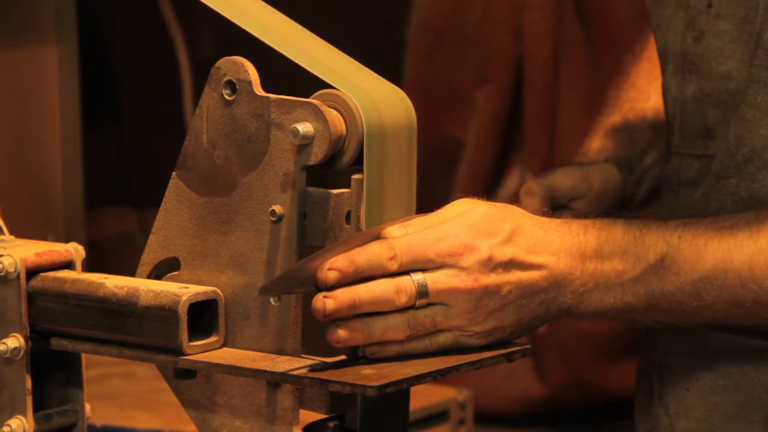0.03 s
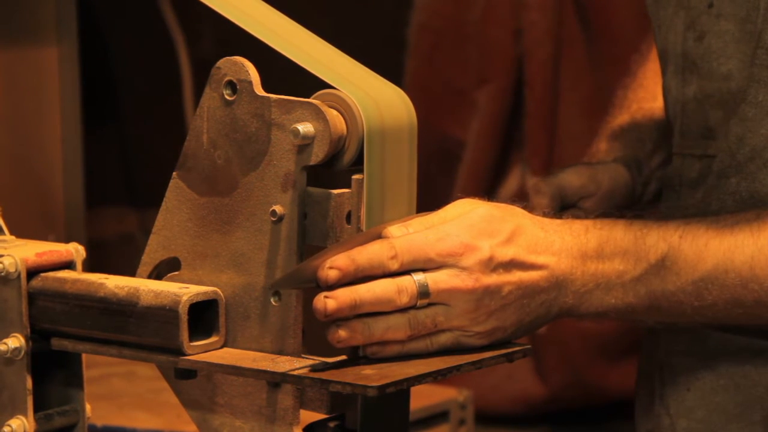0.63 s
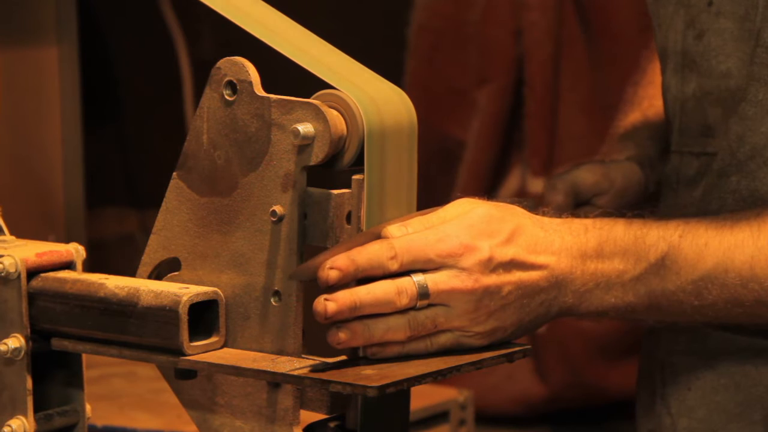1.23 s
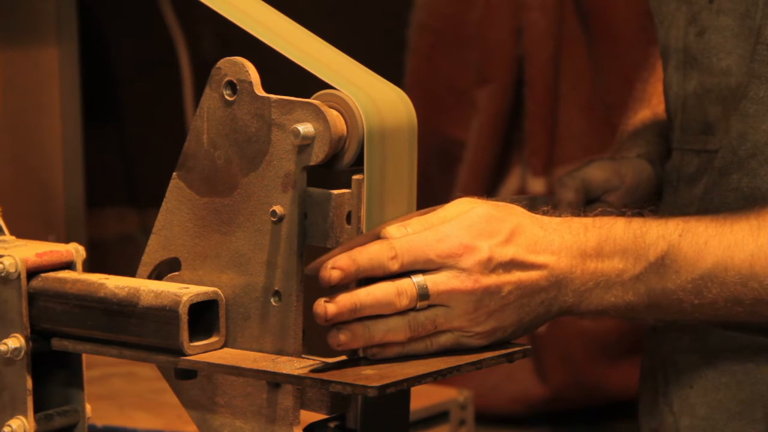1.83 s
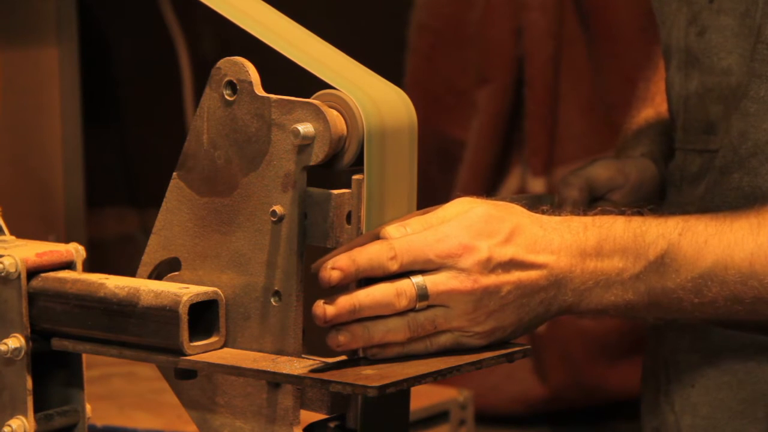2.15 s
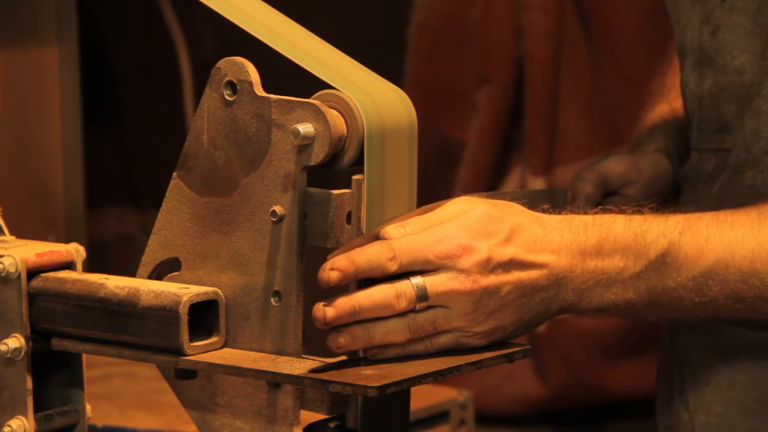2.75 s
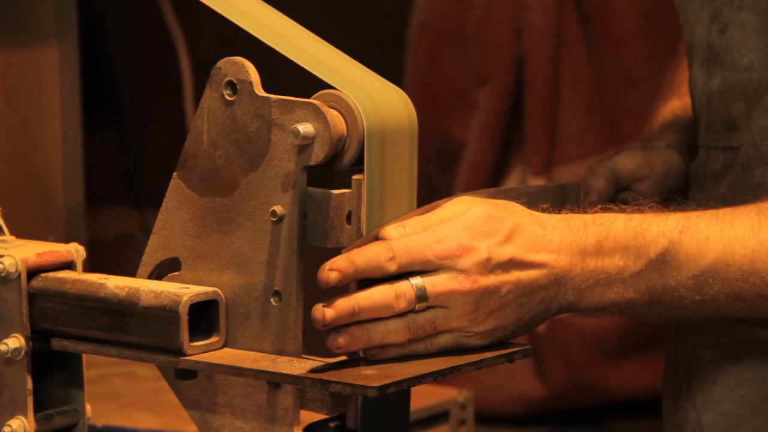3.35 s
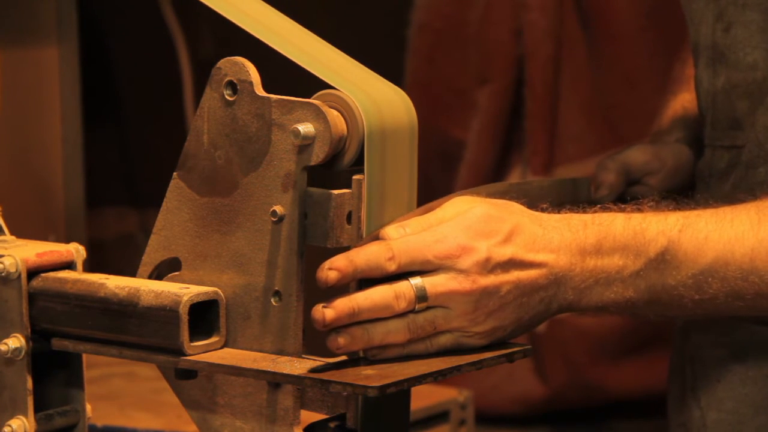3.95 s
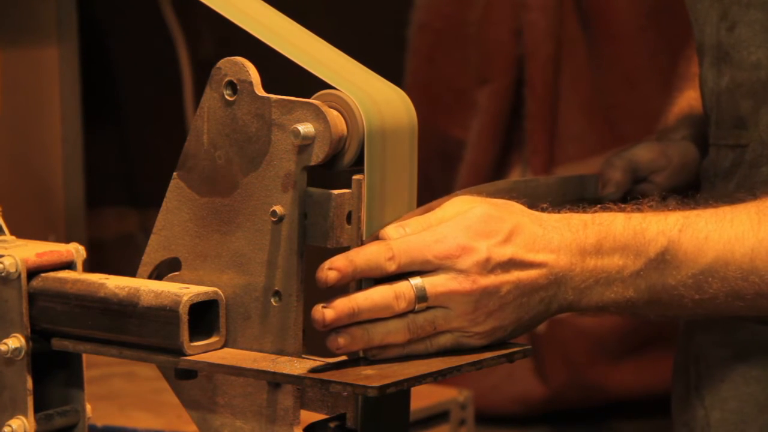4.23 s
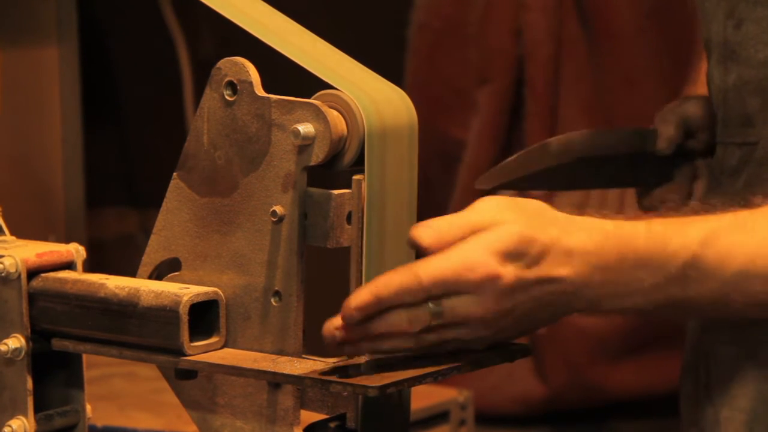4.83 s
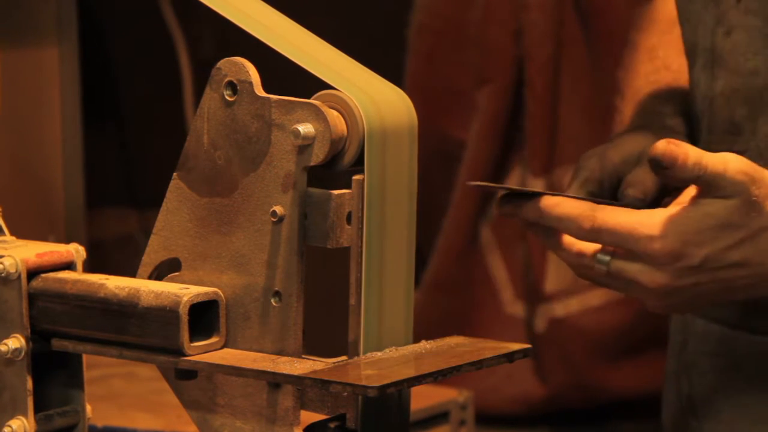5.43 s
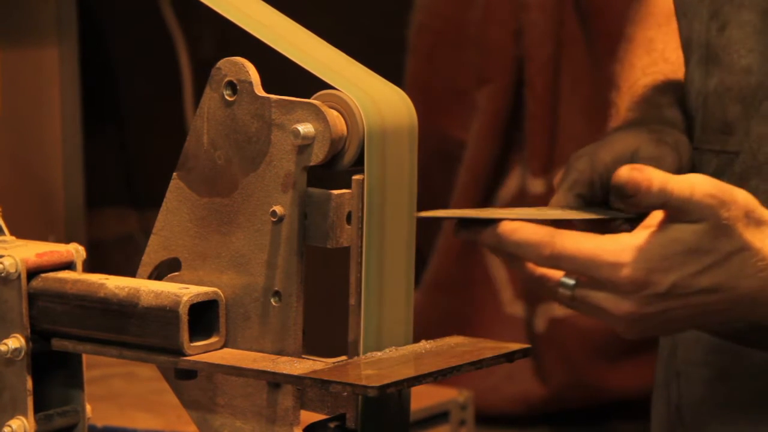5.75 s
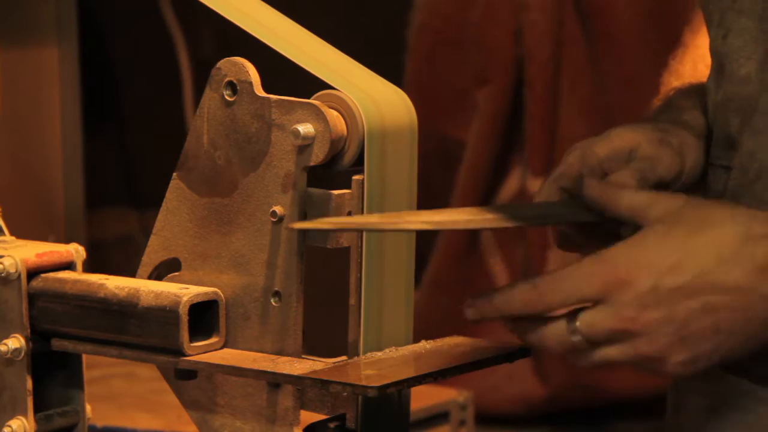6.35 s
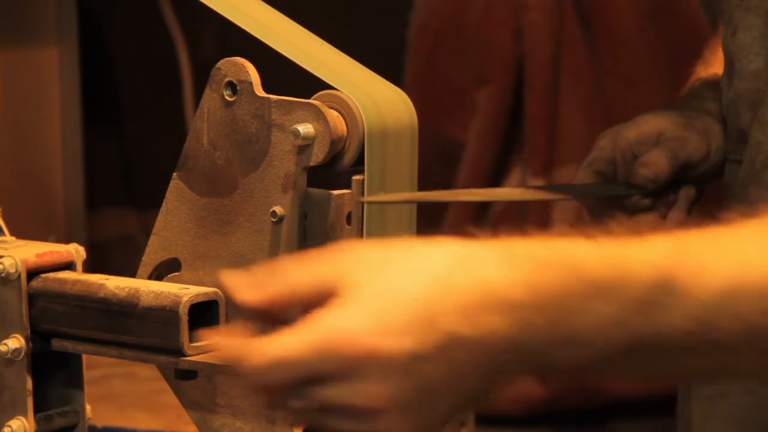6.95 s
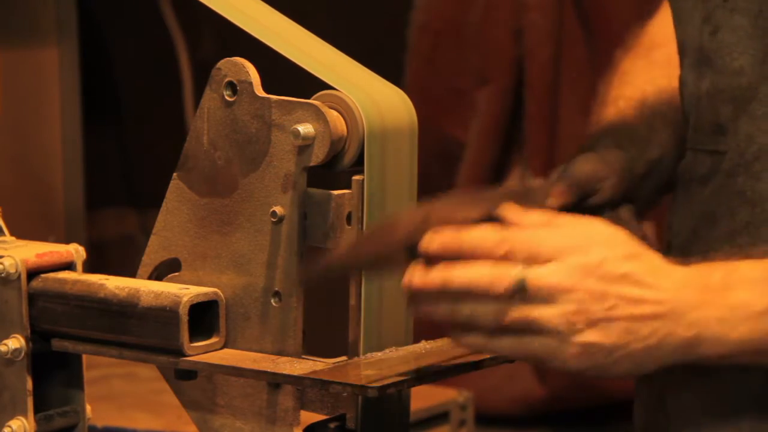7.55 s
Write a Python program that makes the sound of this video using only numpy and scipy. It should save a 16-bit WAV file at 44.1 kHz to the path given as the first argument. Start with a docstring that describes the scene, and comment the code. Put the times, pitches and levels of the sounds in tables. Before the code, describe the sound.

Harsh, gritty grinding of a knife on an abrasive belt gives way to the machine running free with a thin, high whine.

```python
"""A steel knife blank is drawn along a running belt grinder in a small workshop, heel first.
Grit hisses on the steel and rings the blade, over the belt's drone and taps, a bearing's throbbing
whine and a faintly singing motor drive. At 2.5 s the contact slides on to the curve and rasps more.
Near 4.5 s the blade lifts off and the belt runs free, its taps now louder, repeating the same pattern
each lap. Throughout, one close microphone with gain control holds the loudness even."""
import sys
import numpy as np
from scipy import signal
from scipy.fft import rfft, irfft
from scipy.io import wavfile
from scipy.ndimage import uniform_filter1d, minimum_filter1d, map_coordinates

SR = 44100
rng = np.random.default_rng(int(sys.argv[2]) if len(sys.argv) > 2 else 0)


def materialize(psi):
    """Save the field psi as 16-bit PCM at rate SR to the path in sys.argv[1].

    A 1-D psi becomes a single channel; in a 2-D psi each row is a channel.
    """
    bounded = np.clip(np.atleast_2d(psi).T, -1, 1)
    quanta = np.round(bounded * 32767).astype(np.int16)
    wavfile.write(sys.argv[1], SR, quanta)


N = 335160
TIME = np.arange(N) / SR


# The hand pressing the blade on the belt, unsteady at first, then even: (time [s], pressure [dB])
HAND_PRESSURE = [(0.0, -0.3), (0.11, -1), (0.14, -2), (0.18, -3), (0.2, 0.8), (0.32, 1.4), (0.375, -1),
                 (0.4, -2), (0.55, -3), (0.58, -0.8), (0.78, -3.5), (0.83, 0), (1.1, -0.8), (1.24, 0.6),
                 (1.36, -1.6), (1.6, -1.7), (1.7, 0), (1.82, -2.5), (1.92, -1.5), (2.22, 2.5), (2.4, 1.4),
                 (2.47, 0), (2.62, -1), (2.74, -0.1), (4.36, 2)]

def contact(lift_s=4.388, fade_db_per_s=120, belly_s=2.51, blend_s=0.22):
    """The hand's stroke: pressure in dB, share of contact left, crossfade on to the blade's curve."""
    pressure_db, = curves(HAND_PRESSURE)
    touching = undb(-fade_db_per_s * np.maximum(TIME - lift_s, 0))
    belly = np.clip(.5 + (TIME - belly_s) / blend_s, 0, 1)
    return pressure_db, touching, belly


def heel(leave_s=1.5, blend_s=.15):
    """One while the heel of the blade bears on the belt, then zero."""
    return np.clip(.5 + (leave_s - TIME) / blend_s, 0, 1)


def loaded(free, pressed, free_s=4.68, ease_s=0.37):
    """Crossfade a setting from pressed to free as the blade eases off the platen."""
    return free + (pressed - free) * np.clip((free_s - TIME) / ease_s, 0, 1)


# EQ of the grit's bright hiss and of the steel's midrange rasp: (frequency [Hz], level [dB])
HISS_EQ = [(40, -57), (300, -37), (3000, -23), (5500, -6.5), (7000, -0.5), (8500, 0.5), (10500, 1),
           (12500, 2), (14500, -0.5), (15700, -1.5)]
RASP_EQ = [(40, -47), (200, -41), (600, -20), (850, -11), (1100, -5), (1500, 3), (2200, 4), (3000, 1),
           (3700, 2.6), (4450, 0), (5500, -1.2), (7000, -6), (10000, -6)]

def grinding(tip_s=3.02, dull_hz=13300):
    """Grains cut the chattering steel; under pressure the rasp grows faster than the hiss."""
    pressure_db, touching, belly = contact()
    hiss_db = -40.8 + 0.78 * pressure_db
    thinning_db = -4 * np.maximum(TIME - tip_s, 0)  # the blade narrows to its tip
    rasp_db = -44.1 + 1.45 * pressure_db + 1.5 * belly + thinning_db
    chatter_db = .5 * walk(45) + .35 * walk(9)
    hiss = workshop(colour(grit(per_second=30000), HISS_EQ), t60_s=0.26, wet_db=-10)
    hiss = hiss - 0.12 * belly * above(hiss, dull_hz)  # slightly duller on the curve
    rasp = workshop(colour(grit(per_second=16000), RASP_EQ), t60_s=0.13, wet_db=-9)
    return touching * undb(chatter_db) * shifting_contact(undb(hiss_db) * hiss + undb(rasp_db) * rasp)


def grit(per_second, spread_db=1.5):
    """Countless grains of uneven size strike the steel."""
    strikes = rng.random(N) < per_second / SR
    return unit(strikes * rng.standard_normal(N) * undb(spread_db * rng.standard_normal(N)))


def shifting_contact(x, depth_db=0.35):
    """As the patch of contact shifts, each band swells and sinks a little on its own."""
    out = 0
    for edge_hz in (1500, 2200, 3100, 4300, 5800, 7600, 9800, 12500):
        upper = above(x, edge_hz)
        out = out + (x - upper) * undb(depth_db * walk(4))
        x = upper
    return out + x


# Rings of the blade along the stroke: (start [s], end [s], frequency [Hz], width [Hz], level [dB])
BLADE_RINGS = [(0.0, 2.7, 8530, 130, -59), (0.75, 1.42, 8300, 1900, -51), (0.8, 1.1, 3150, 250, -56),
               (1.62, 1.8, 11900, 1400, -51), (1.63, 1.8, 2350, 150, -53), (1.84, 2.33, 2365, 85, -50.5),
               (1.85, 2.32, 5500, 900, -53), (1.88, 2.3, 9200, 180, -56), (2.08, 2.5, 14000, 1800, -51),
               (2.4, 2.95, 70, 14, -81), (2.6, 3.38, 862, 21, -61.5), (2.8, 4.25, 1040, 170, -60),
               (2.95, 3.5, 1326, 80, -57), (3.1, 3.6, 1970, 90, -58), (2.9, 3.95, 2050, 400, -54),
               (3.1, 3.45, 12545, 40, -53), (2.75, 3.54, 6800, 250, -56.5), (3.35, 4.5, 3760, 230, -54),
               (3.87, 4.48, 3950, 1080, -50), (3.88, 4.2, 6250, 250, -56)]

def blade_rings():
    """Resonances of the blade swell and fade as the contact slides along it."""
    out = 0
    for start, end, hz, width, db in BLADE_RINGS:
        swell = np.sin(np.pi * np.clip((TIME - start) / (end - start), 0, 1))
        out = out + undb(db) * swell * resonate(rng.standard_normal(N), hz, width)
    return out


# Tempo of the belt, dragged down a little by the blade: (time [s], speed [laps/s])
BELT_SPEED = [(0, 4.146), (2.2, 4.146), (2.5, 4.157), (4.35, 4.157), (4.55, 4.218), (7.6, 4.218)]
FREE_LAPS_PER_S = BELT_SPEED[-1][1]
SPLICE_PHASE = .15  # where in the lap the belt's joint passes the platen
BELLY_STEADYING_DB = -1.5  # the blade's curve steadies the belt

def belt_laps():
    """The belt's travel in laps, the clock for the machine's rhythms."""
    return np.cumsum(curves(BELT_SPEED)[0]) / SR


# Swells and lulls of the belt's rattle, frame and taps: (time [s], level [dB], rattle treble boost [dB])
BELT_SURGE = [(4.35, 0.5, 1.5), (4.52, -1.2, -0.3), (4.66, -0.6, -0.3), (4.82, 0, -0.3), (4.895, 0, 1.5),
              (4.97, -0.5, 0), (5.06, 0.7, 0), (5.3, -0.8, 0), (5.55, -0.3, 0), (5.8, -0.3, 0),
              (6.57, -0.8, 0), (6.68, 0.5, 0.4), (6.76, -0.6, 0), (7.24, -0.9, 0), (7.35, 0.9, 0),
              (7.46, -0.5, 0), (7.56, 0.6, 0.5)]
# EQ of the belt's broad rattle and of its low flap: (frequency [Hz], level [dB])
RATTLE_EQ = [(40, -54), (300, -16), (680, -18.5), (850, -11), (1000, -8.5), (1150, -3), (1320, -6.5),
             (1550, -3), (2000, -1.6), (2450, -3.5), (2750, -2), (3100, -4.5), (4600, -1.7), (6000, -5.5),
             (7200, -8), (12500, -11), (15500, -18)]
FLAP_EQ = [(40, -42), (200, -20), (240, -5), (275, 1), (365, 1.5), (440, 4.5), (490, -8.5), (545, 2.5),
           (600, 2.5), (650, -8.5), (1000, -33)]

def belt(laps, treble_hz=3400, lap_swell_db=2.6):
    """The belt rattles over wheels and platen, shakes the frame and flaps harder once a lap."""
    _, touching, belly = contact()
    surge_db, treble_db = curves(BELT_SURGE)
    rattle = workshop(colour(surface(laps, fresh=0.27), RATTLE_EQ), t60_s=0.16, wet_db=-12)
    rattle = undb(-44 - 2 * touching) * rattle  # the pressed blade quiets it
    rattle = rattle + (undb(treble_db) - 1) * above(rattle, treble_hz)
    swell_db = lap_swell_db * np.cos(2 * np.pi * (laps - SPLICE_PHASE))
    flap_db = -66.5 + swell_db + BELLY_STEADYING_DB * belly * touching
    flap = undb(flap_db) * colour(surface(laps, fresh=0.18), FLAP_EQ)
    return undb(surge_db) * (rattle + frame(laps) + taps(laps)) + flap


def surface(laps, fresh):
    """The belt's roughness loops lap after lap, with a share of fresh noise."""
    size = int(SR / FREE_LAPS_PER_S)
    pattern = rng.standard_normal(size)
    passing = unit(map_coordinates(pattern, [laps * size % size], order=3, mode="grid-wrap"))
    return np.sqrt(1 - fresh) * passing + np.sqrt(fresh) * rng.standard_normal(N)


# Modes of platen and frame: (frequency [Hz], width [Hz], free level [dB], pressed level [dB])
FRAME_MODES = [(543.3, 8.9, -82, -80), (851, 15, -80, -76), (996, 8.8, -71, -67), (1066, 8.7, -66, -67.5),
               (1132, 10, -64.5, -73), (1154.4, 12, -69, -62), (1190, 12, -70, -69.5), (1290, 6, -68, -65),
               (1371, 7.5, -65.5, -64.5), (1467, 16, -67, -61.5), (1660, 7.7, -65.5, -74),
               (1749, 6.9, -65.5, -67), (2006, 12, -67, -67), (2450, 9.7, -63.5, -64.5),
               (2484, 8, -63.5, -63), (2630, 8.9, -67, -76), (2740, 8, -69, -76), (3793, 10, -65.5, -74),
               (4076, 14, -63, -78), (4530, 12, -61, -85), (4920, 14, -66, -83), (6380, 50, -64.5, -76)]

def frame(laps, evenness=0.077):
    """Steady rubbing keeps the frame ringing; the blade damps some modes and wakes others."""
    rubbing = surface(laps, fresh=0.36)
    out = 0
    for hz, width, free_db, pressed_db in FRAME_MODES:
        ring = resonate(rubbing, hz, width)
        envelope = np.sqrt(np.abs(uniform_filter1d(ring ** 2, SR // 14)) + 1e-3)
        sustained = unit(ring / envelope ** evenness)  # softens the slow beats
        out = out + undb(loaded(free_db, pressed_db)) * sustained
    return out


# Tap pattern for each ring of the platen: frequency [Hz]: (place in the lap [0-1], level [dB])
TAP_PATTERN = {1421.5: [(.185, -53), (.278, -49), (.395, -54.5), (.535, -53), (.688, -51), (.758, -49.5),
               (.95, -49.5)], 1222: [(.09, -51.5), (.215, -56), (.315, -52), (.47, -53), (.54, -55),
               (.6, -54), (.725, -52), (.945, -54)], 2484: [(.1, -55), (.27, -54.5), (.35, -55),
               (.545, -54.5), (.62, -56), (.87, -54), (.955, -56)]}

def taps(laps, attack_s=0.0046, scatter_rad=0.7):
    """Stiff spots of the belt tap the platen in the same rhythm every lap; the blade damps them."""
    out = 0
    for hz, spots in TAP_PATTERN.items():
        ring = 0
        jitter = 0.5 * walk(90)
        for place, db in spots:
            age = (laps - place) % 1 / FREE_LAPS_PER_S / attack_s
            tone = belt_tone(laps, hz, jitter + scatter_rad * rng.standard_normal())
            ring = ring + undb(db) * age * np.exp(1 - age) * tone
        out = out + ring * undb(1.1 * walk(14))
    return undb(loaded(free=-2.3, pressed=-9)) * out


def belt_tone(laps, free_hz, jitter_rad):
    """A tone whose pitch follows the belt's speed."""
    return np.sin(2 * np.pi * free_hz * laps / FREE_LAPS_PER_S + jitter_rad) * np.sqrt(2)


# Partials of the whine: (frequency [Hz], vibrato [Hz], level [dB], throb depth [0-1],
# ripples [per turn], ripple depth [0-1], falter [dB])
BEARING_WHINE = [(11562, -48, -49.8, .42, 6, .2, 1), (13160, 32, -54.6, .38, 5, .45, 2.1),
                 (11750, 30, -61, .1, 4, .4, 1.2)]

def bearing(laps, turns_per_lap=4.62, wander_hz=22, flutter_db=2):
    """A dry bearing's whine swings with each turn, ripples as the balls pass and falters by chance."""
    angle = 2 * np.pi * laps * turns_per_lap
    out = 0
    for hz, vibrato_hz, db, throb, ripples, ripple_depth, falter_db in BEARING_WHINE:
        pitch = hz + vibrato_hz * np.cos(angle) + wander_hz * walk(250)
        tremolo = (1 + throb * np.cos(angle)) * (1 + ripple_depth * np.cos(ripples * angle))
        flicker = undb(flutter_db * walk(160) + falter_db * walk(18))
        out = out + undb(db) * unit(tremolo * flicker * np.sin(2 * np.pi * np.cumsum(pitch) / SR))
    return out


# Tones of the taut belt:
# (frequency [Hz], free level [dB], pressed level [dB], boost under the heel [dB], throb [dB])
DRONE_TONES = [(261.5, -77.5, -81, 0, 2.5), (281, -85, -82.5, 2.5, 9), (333, -79.5, -79, -1, 4),
               (362.7, -78.5, -78, -3, 2), (405, -89, -86, 1, 13.5), (426, -78, -78, 1.5, 10),
               (443, -78, -78.5, -1, 2), (544, -82, -84, 1, 8), (732, -83, -84, 0, 9),
               (858, -86, -79, 0, 8), (997, -78, -72, -1, 5), (1222, -73.5, -80, 0, 2),
               (1421.5, -68, -79, 0, 0)]

def drone(laps, bump_width_laps=.16, drag_laps=0.089):
    """The taut belt drones and throbs as its joint passes the platen, a little later under the blade."""
    _, touching, belly = contact()
    from_splice = (laps - SPLICE_PHASE - drag_laps * touching + .5) % 1 - .5
    bump = np.exp(-.5 * (from_splice / bump_width_laps) ** 2)
    out = 0
    for hz, free_db, pressed_db, heel_db, throb_db in DRONE_TONES:
        db = loaded(free_db, pressed_db) + heel_db * heel() + throb_db * bump + 1.4 * walk(7)
        out = out + undb(db) * belt_tone(laps, hz, 0.37 * walk(9))
    return undb(BELLY_STEADYING_DB * belly * touching) * out


# A low hum and the thin switching tones of the motor's drive: (frequency [Hz], level [dB])
MOTOR_TONES = [(129, -81), (7773, -74), (7854, -73), (7892, -65), (7935, -71), (7973, -67), (8011, -71),
               (8053, -68)]
# EQ of the rumble bed: (frequency [Hz], level [dB])
RUMBLE_EQ = [(20, -19), (60, -9), (85, -6), (110, 1), (160, 1), (200, -1), (500, -9), (2000, -57)]

def motor(laps, hum_hz=226.5):
    """Rumble and main hum change with the grinding load, under slightly wavering electrical tones."""
    tones = 0
    for hz, db in MOTOR_TONES:
        gain = undb(db + 1.6 * walk(7.1))
        tones = tones + gain * unit(np.sin(2 * np.pi * hz * TIME + 0.56 * walk(3.5)))
    pressure_db, _, _ = contact()
    heel_db = (9 + 1.6 * pressure_db) * heel()  # under the heel the hum rises and follows the hand
    hum_db = loaded(free=-81, pressed=-83) + heel_db + walk(4)
    hum = undb(hum_db) * unit(np.sin(2 * np.pi * hum_hz * TIME + 0.28 * walk(3.46)))
    rumble_db = loaded(free=-72.8, pressed=-73.4)  # the pressed blade steadies the frame
    return tones + hum + undb(rumble_db) * colour(surface(laps, fresh=0.47), RUMBLE_EQ)


def workshop(x, t60_s, wet_db):
    """Direct sound plus dense, quickly fading reflections from bench and walls."""
    t = TIME[:SR // 3]
    echoes = rng.standard_normal(len(t)) * np.exp(-np.log(1000) * t / t60_s)
    return unit(x + undb(wet_db) * signal.fftconvolve(x, echoes / np.linalg.norm(echoes))[:N])


def undb(db):
    """Decibels to gain."""
    return 10 ** (np.asarray(db) / 20)


def unit(x):
    """Scale to an rms of one."""
    return x / np.sqrt(np.mean(x ** 2))


def curves(table):
    """The columns of a time table as automation curves, one value per sample."""
    s, *columns = np.transpose(table)
    return [np.interp(TIME, s, c) for c in columns]


def walk(rate):
    """Smooth random drift with a spread near one and `rate` changes a second."""
    k = max(int(SR / rate), 1)
    return unit(uniform_filter1d(np.repeat(rng.standard_normal(N // k + 1), k), k)[:N])


def colour(x, eq):
    """Shape x with an EQ curve, then normalise."""
    hz, db = np.transpose(eq)
    f = np.arange(N // 2 + 1) * SR / N
    return unit(irfft(rfft(x) * undb(np.interp(np.log(f + 1), np.log(hz), db)), N))


def resonate(x, hz, width):
    """One resonance driven by x, applied twice for steep skirts."""
    b, a = signal.iirpeak(hz, hz / (2 * width), fs=SR)
    return unit(signal.lfilter(b, a, signal.lfilter(b, a, x)))


def above(x, hz):
    """Zero-phase high-pass."""
    return signal.sosfiltfilt(signal.butter(4, hz, "high", fs=SR, output="sos"), x)


def gain_control(x, target_db, follow_s, hold_s, release_db_per_s):
    """Duck as the running power exceeds the target, hold a moment, then let the gain creep back."""
    power = np.mean(x ** 2, axis=0)
    keep = np.exp(-1 / (follow_s * SR))
    settled = keep * power[:SR // 10].mean()
    running = signal.lfilter([1 - keep], [1, -keep], power, zi=[settled])[0]
    needed_db = np.minimum(target_db - 10 * np.log10(running), 0)
    half = int(hold_s * SR / 2)
    held_db = minimum_filter1d(needed_db, 2 * half + 1, origin=half, mode="nearest")
    ramp_db = release_db_per_s * TIME
    return x * undb(ramp_db + np.minimum.accumulate(held_db - ramp_db))


def scene():
    """Machine and blade, panned dead centre."""
    laps = belt_laps()
    machine = belt(laps) + drone(laps) + bearing(laps) + motor(laps)
    mix = machine + grinding() + blade_rings()
    return np.array([mix, mix])


def record(dry):
    """Gain control, then a steep high cut."""
    held = gain_control(dry, target_db=-41.5, follow_s=0.17, hold_s=0.11, release_db_per_s=21)
    high_cut = signal.ellip(12, .1, 75, 15750, fs=SR, output="sos")
    return signal.sosfilt(high_cut, held)


dry = scene()
out = record(dry)
materialize(out)
```